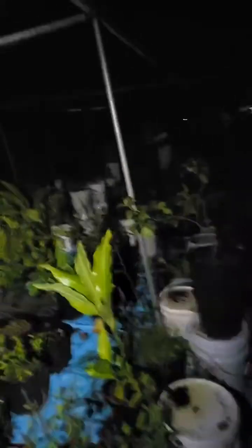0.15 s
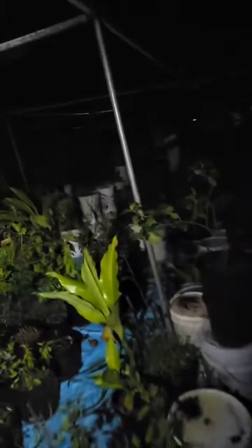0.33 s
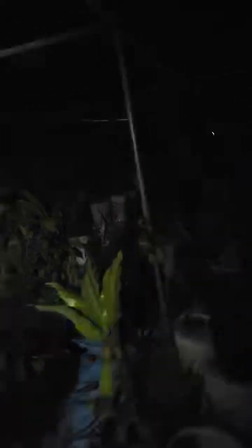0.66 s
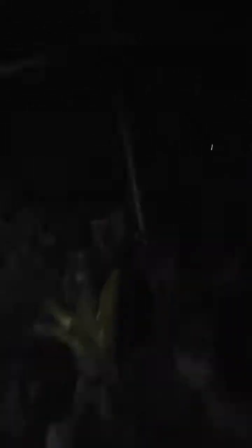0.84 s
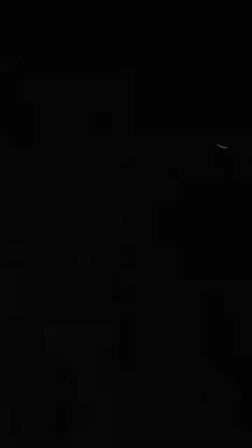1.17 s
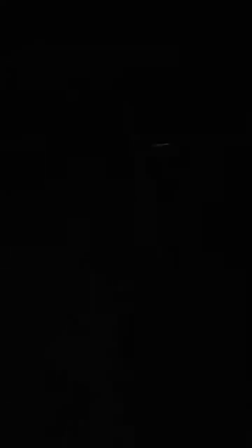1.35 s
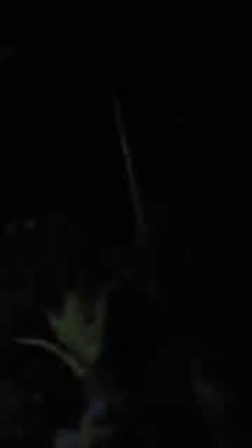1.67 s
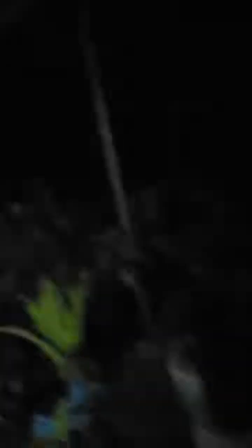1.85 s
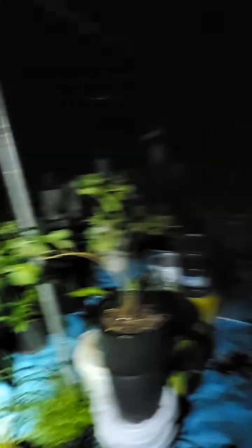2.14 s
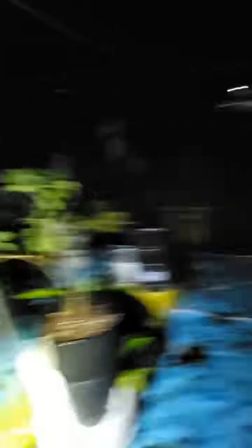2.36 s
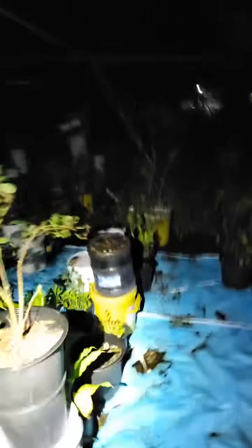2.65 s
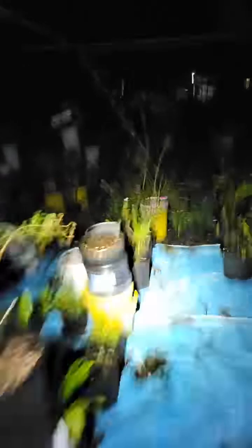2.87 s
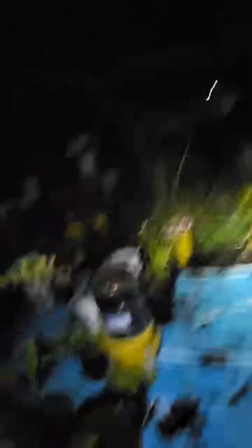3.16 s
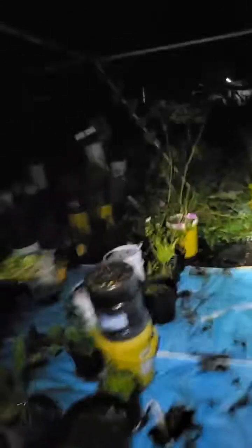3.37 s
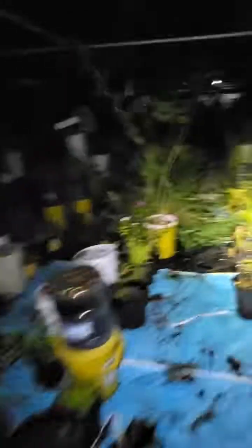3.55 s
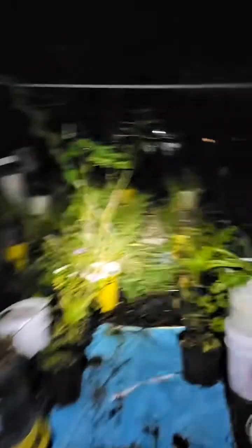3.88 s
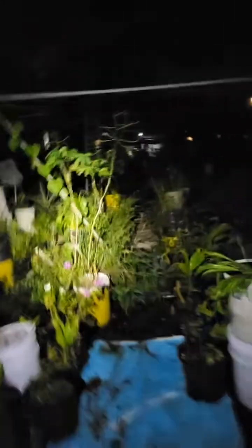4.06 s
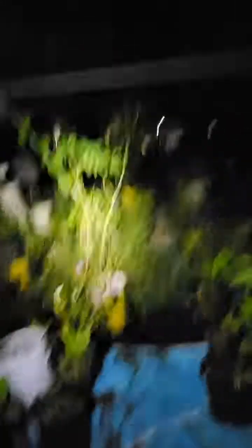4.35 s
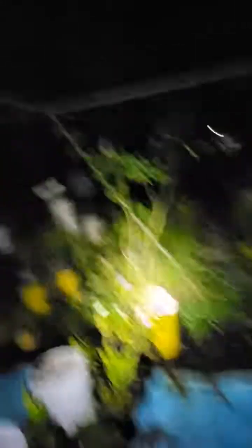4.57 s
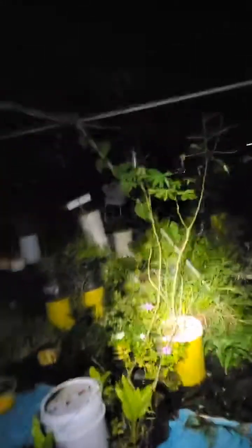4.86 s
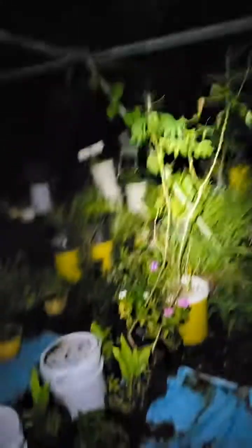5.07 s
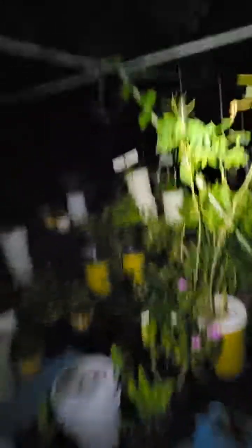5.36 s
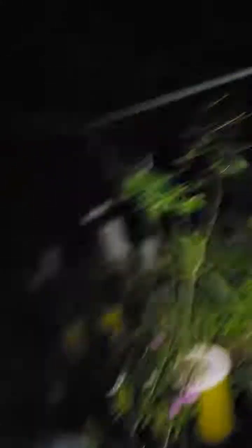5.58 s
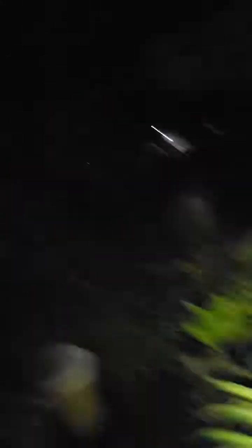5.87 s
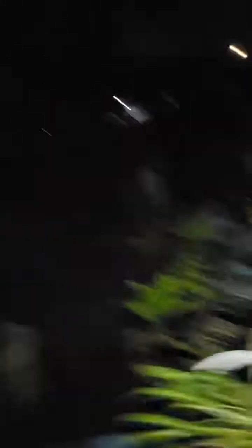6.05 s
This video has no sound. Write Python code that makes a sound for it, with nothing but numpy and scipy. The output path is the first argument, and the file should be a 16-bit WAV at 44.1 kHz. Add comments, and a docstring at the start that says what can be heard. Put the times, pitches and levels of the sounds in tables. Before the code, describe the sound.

Frogs whistle and crickets trill in a steady night chorus while soft footsteps crunch and crinkle over a gritty tarpaulin.

```python
"""A garden at night. From the start, crickets and a katydid trill over a distant engine's rumble;
tree frogs whistle upward, others answer with lower falling notes, and a far chorus of both fills the dark.
Someone walks softly over a gritty tarpaulin: a sole squeaks, and from about two seconds on the sheet
crinkles, heels thud and clods crack. Near five seconds a hand bumps the microphone once.
At the end cloth brushes through the last stride and the katydid is close."""
import sys
import numpy as np
from scipy import signal
from scipy.fft import rfft, irfft, next_fast_len
from scipy.io import wavfile
from scipy.ndimage import map_coordinates

SR = 44100
rng = np.random.default_rng(int(sys.argv[2]) if len(sys.argv) > 2 else 0)


def put_to_file(sound):
    """Save the sound as 16-bit audio at rate SR, in the file named by the first command-line argument."""
    columns = np.atleast_2d(sound).T  # one column per channel
    safe = np.clip(columns, -1, 1)
    whole_steps = np.round(safe * 32767)
    wavfile.write(sys.argv[1], SR, whole_steps.astype(np.int16))


N = 274302


def amp(db):
    """Decibels to gain."""
    return 10 ** (np.asarray(db) / 20)


def unit(x):
    """Scale to rms 1."""
    return x / np.sqrt(np.mean(x ** 2) + 1e-20)


def along(points, hz):
    """Read (Hz, value) points on a log frequency axis."""
    freqs, values = np.transpose(points)
    return np.interp(np.log(hz + 1), np.log(freqs + 1), values)


def fader(points):
    """A fader ride through (seconds, dB) points, in dB for every sample."""
    return np.interp(np.arange(N) / SR, *np.transpose(points))


def envelope(s, rise, hold, release):
    """Gain 1 from s for hold seconds; rise and release are the times to gain and lose 20 dB."""
    t = np.arange(N) / SR - s
    return amp(-20 * (np.maximum(-t, 0) / rise + np.maximum(t - hold, 0) / release).clip(0, 10))


def wobble(rate):
    """A smooth random curve, rate knots a second."""
    return map_coordinates(rng.standard_normal(8192), [np.arange(N) * rate / SR], mode="wrap")


def filtered(x, response):
    """Equalise x with a gain given as a function of Hz."""
    size = next_fast_len(N + SR // 2)
    return irfft(rfft(x, size) * response(np.fft.rfftfreq(size, 1 / SR)), size)[:N]


def noise(spectrum):
    """Coloured noise of rms 1."""
    return unit(filtered(rng.standard_normal(N), lambda hz: amp(along(spectrum, hz))))


def band(centre_hz, width_hz):
    """A steep-sided band of noise, rms 1."""
    white = rng.standard_normal(N)
    return unit(filtered(white, lambda hz: 1 / (1 + (2 * np.abs(hz - centre_hz) / width_hz) ** 4)))


def impulse(spectrum, size=1024):
    """The minimum-phase ring of a body with this spectrum, energy 1."""
    cepstrum = irfft(np.log(amp(along(spectrum, np.fft.rfftfreq(size, 1 / SR)))))
    cepstrum[1:size // 2] *= 2
    cepstrum[size // 2 + 1:] = 0
    ring = irfft(np.exp(rfft(cepstrum)))
    return ring / np.linalg.norm(ring)


def add(track, s, sound):
    """Mix a sound into the track at s seconds and return the track."""
    part = track[max(round(s * SR), 0):][:len(sound)]
    part += sound[:len(part)]
    return track


# The garden's reverb. Each row: frequency in Hz, seconds to die away by 60 dB.
GARDEN_DECAY = [(200, 0.57), (2000, 0.36), (10000, 0.15)]

def garden(x):
    """Diffuse reflections off pots, leaves and roof, wet only."""
    hz, t, spectra = signal.stft(rng.standard_normal(SR // 2), SR, nperseg=256)
    decay = amp(-60 * t / along(GARDEN_DECAY, hz)[:, None])
    tail = signal.istft(spectra * decay, SR, nperseg=256)[1]
    return signal.fftconvolve(x, tail / np.linalg.norm(tail))[:N]


# The tone of the air. Each row: frequency in Hz, relative level in dB.
AIR_EQ = [(100, 6), (200, 2), (450, -4), (900, 0), (1400, -2), (2100, 3.5), (2500, 6), (3400, 1.5),
          (3800, -25.5), (5000, -5), (5700, -10), (7800, -16.5), (11000, -27), (16000, -24)]

def night_air():
    """The steady hush of the night air."""
    return amp(-51.5) * noise(AIR_EQ)


# The engine's noise colour and its hum tones. Each row: frequency in Hz, relative level in dB.
RUMBLE_EQ = [(15, -45), (28, -33), (42, -8), (56, 3.5), (75, 2.5), (100, -2.5), (135, -7.5), (180, -23),
             (300, -47)]
HUM_TONES = [(56, -46.5), (124.7, -52.5)]
# The ride on the hum. Each row: time in seconds, gain in dB.
HUM_RIDE = [(0, 4.5), (.9, -1.5), (1.3, -3), (3, -9), (4.5, -3), (6.22, -27)]

def engine():
    """A distant engine: a steady rumble under two wavering tones that fade away."""
    t = np.arange(N) / SR
    hum = sum(amp(db + 3.2 * wobble(5.25)) * np.sin(2 * np.pi * hz * t + 0.18 * wobble(3.47))
              for hz, db in HUM_TONES)
    return amp(fader(HUM_RIDE)) * hum + amp(-48) * noise(RUMBLE_EQ)


def wing_strokes(rate_hz, depth_db, drift):
    """Tremolo from an insect's wing strokes, now deeper, now shallower; rms 1."""
    phase = 2 * np.pi * np.cumsum(rate_hz * (1 + drift * wobble(9.3))) / SR
    return unit(amp(depth_db * wobble(3.67) * np.sin(phase)))


# The rides on the insects. Each row: time in seconds, level in dB before trims.
LOW_CRICKET_RIDE = [(0.0, -54.5), (0.24, -54.5), (1.87, -51.5), (3.07, -51.5), (3.53, -53.5), (4.23, -50.5),
                    (4.83, -55.5), (5.49, -51), (6.22, -57.5)]
HIGH_CRICKET_RIDE = [(0.0, -48), (0.87, -51.5), (1.56, -52), (2.98, -48), (3.26, -51), (4.43, -52.5),
                     (5.6, -49), (6.22, -56.5)]
FAR_CRICKET_RIDE = [(0.0, -60), (2.08, -60), (2.27, -57), (2.55, -59.5), (4.59, -63), (4.73, -77),
                    (6.22, -61)]
KATYDID_RIDE = [(0, -62), (.5, -69.5), (1.5, -66), (5.66, -65.5), (5.84, -53.5), (6.22, -57)]

def insects():
    """Wings rub out two cricket trills with faint octaves and a high katydid, over a smooth crowd."""
    low_strokes = wing_strokes(rate_hz=32.7, depth_db=1.404, drift=0.015)
    high_strokes = wing_strokes(rate_hz=43.6, depth_db=1.443, drift=0.02)
    low = amp(fader(LOW_CRICKET_RIDE) - 0.65) * low_strokes * (band(6157, 560) + amp(-3) * band(6125, 53))
    high = amp(fader(HIGH_CRICKET_RIDE) - 0.5) * high_strokes * band(7026, 580)
    far_db = fader(FAR_CRICKET_RIDE)
    crowd = amp(-60) * band(6800, 830) + amp(far_db - 1) * band(4790, 1460)
    crowd += amp(-65) * band(6633, 50) + amp(far_db - 10) * band(5135, 70)
    katydid_strokes = wing_strokes(rate_hz=61, depth_db=1.365, drift=0.046)
    katydid = amp(fader(KATYDID_RIDE)) * katydid_strokes * band(9580, 1300)
    octaves = (amp(-65) * band(13200, 2100) + amp(-72.5) * band(15200, 1100)) * amp(0.67 * wobble(7.6))
    return low * amp(0.55 * wobble(3.6)) + high * amp(0.45 * wobble(4.34)) + crowd + katydid + octaves


def note(length, start_hz, end_hz, bend=0.522):
    """A pure gliding note with soft ends; a positive bend moves fast at first, then levels off."""
    progress = np.linspace(0, 1, max(int(length * SR), 2))
    pitch = start_hz + (end_hz - start_hz) * (progress + bend * progress * (1 - progress))
    fades = np.clip(np.minimum(progress / 0.16, (1 - progress) / 0.22), 0, 1)
    return np.sin(np.pi / 2 * fades) * np.sin(2 * np.pi * np.cumsum(pitch) / SR)


def chorus(pitch_hz, spread, glide_hz, length, scatter_db, count):
    """A crowd of frogs, each at its own pitch and distance, blurred by the garden; rms 1."""
    crowd = np.zeros(N + SR)
    times = (np.arange(count) + rng.random(count)) / count * len(crowd) / SR
    for s, (detune, stretch, nearness) in zip(times, rng.standard_normal((count, 3))):
        hz = pitch_hz * np.exp(spread * np.clip(detune, -2, 2))
        call = note(length * np.exp(0.2475 * stretch), hz - glide_hz / 2, hz + glide_hz / 2)
        add(crowd, s, amp(scatter_db * nearness) * call)
    crowd = crowd[SR // 2:][:N]
    return unit(crowd + garden(crowd))


# Bouts of far whistling. Each row: start in seconds, hold in seconds, level in dB.
WHISTLE_BOUTS = [(0, 0.28, -48), (.48, .1, -44), (.76, 0.083, -43.5), (.96, 0.22, -47), (1.332, 0.18, -46),
                 (1.675, .12, -43.5), (1.974, 0.057, -46.5), (2.197, .05, -45), (2.4, 0.17, -44.5),
                 (2.72, 0.15, -46), (3.1, 0.037, -43), (3.325, 0.19, -46), (3.7, 0.099, -41.5),
                 (3.973, 0.23, -44), (4.25, 0.16, -47.5), (4.506, 0.33, -44.5), (4.806, .23, -41.5),
                 (5.25, 0.043, -45), (5.47, 0.087, -43.5), (5.8, 0.13, -41.5), (6.014, 0.2, -42.5)]

def far_whistlers(floor_db=-50):
    """Far tree frogs join in bouts; as every note rises, the high end of a bout comes late."""
    bout_power = sum((amp(db) * envelope(s, 0.065, hold, 0.16)) ** 2 for s, hold, db in WHISTLE_BOUTS)
    swell = np.sqrt(amp(floor_db) ** 2 + bout_power)
    shift = int(0.02 * SR)
    early = np.pad(swell, (0, shift), "edge")[shift:]
    late = np.pad(swell, (shift, 0), "edge")[:N]
    low = chorus(pitch_hz=2800, spread=0.0322, glide_hz=303.5, length=0.0596, scatter_db=3, count=750)
    high = chorus(pitch_hz=3054, spread=0.03277, glide_hz=250.5, length=0.061, scatter_db=0.5, count=750)
    return early * low + late * high


# Swells and lulls of the far low frogs. Each row: centre in seconds, length in seconds, change in dB.
LOW_FROG_SURGES = [(0.19, 0.18, -8), (3.702, 0.081, -5), (4.81, 0.27, 7), (4.956, 0.21, -11),
                   (5.125, .16, -14)]

def far_low_frogs():
    """Two far crowds with falling notes, one higher and shorter, swell and fall quiet together."""
    surge_db = np.zeros(N)
    for s, length, db in LOW_FROG_SURGES:
        add(surge_db, s - length / 2, db * np.hanning(int(length * SR)))
    pond = chorus(pitch_hz=1662.5, spread=0.02514, glide_hz=-65, length=0.0564, scatter_db=5, count=600)
    peeps = chorus(pitch_hz=1824, spread=0.04, glide_hz=-140, length=0.033, scatter_db=1.5, count=500)
    return amp(surge_db) * (amp(-46) * pond + amp(-51) * peeps)


def falling_glide(length, hz):
    """Glide of a low note in Hz: the higher it is, the further it sinks."""
    return -55 - 0.31 * (hz - 1604)


def rising_glide(length, hz):
    """Glide of a whistle in Hz: the longer it lasts, the further it climbs."""
    return 353 * np.sqrt(length / 0.0514)


# The near frogs' calls. Each row: start in seconds, length in seconds, middle pitch in Hz, level in dB.
FALLING_CALLS = [(.05, 0.1, 1556, -39), (.26, 0.098, 1644, -34.5), (.36, 0.035, 1800, -36.5),
                 (.545, 0.071, 1600, -38.5), (1.015, 0.032, 1904, -40.5), (1.1, 0.068, 1535, -42.5),
                 (1.13, 0.023, 1805, -42), (1.24, 0.061, 1698, -39.5), (1.525, .065, 1683, -40),
                 (1.695, 0.071, 1877, -43), (1.755, 0.041, 1660, -34), (1.89, 0.069, 1550, -39),
                 (2.045, 0.035, 1720, -34.5), (2.19, 0.061, 1636, -38), (2.465, 0.08, 1580, -40.5),
                 (2.63, 0.071, 1870, -41), (2.795, 0.021, 1840, -39), (2.8, 0.049, 1584, -40),
                 (2.9, 0.058, 1723, -41), (3.46, 0.065, 1720, -40), (3.5, 0.092, 1541, -38.5),
                 (3.62, 0.021, 1793, -36.5), (3.93, 0.053, 1555, -35), (4.065, 0.064, 1652, -34.5),
                 (4.09, 0.033, 1875, -41), (4.172, 0.044, 1833, -34.5), (4.65, 0.042, 1845, -38),
                 (4.66, 0.073, 1615, -36), (4.74, 0.02, 1814, -29), (4.765, 0.033, 1920, -32),
                 (4.772, 0.034, 1692, -30), (4.995, .083, 1597, -37), (5.28, 0.13, 1855, -43),
                 (5.375, 0.03, 1900, -29), (5.585, 0.051, 1665, -38), (5.87, 0.035, 1866, -39),
                 (5.95, 0.037, 1850, -34.5), (6.055, 0.032, 1904, -42), (6.15, 0.047, 1855, -40)]
RISING_CALLS = [(.43, .045, 2830, -37.5), (.48, 0.09, 2990, -38), (.7, .12, 2675, -43),
                (1.05, 0.074, 3095, -40.5), (1.3, .055, 2950, -41.5), (1.335, 0.099, 2680, -40.5),
                (1.63, 0.029, 2790, -38), (1.94, 0.089, 2835, -39.5), (2.425, 0.061, 2993, -36.5),
                (2.69, 0.036, 2960, -36), (2.755, .033, 2926, -38), (3.32, 0.028, 3030, -39),
                (3.41, .058, 2945, -39), (3.69, 0.13, 2915, -49), (3.712, 0.018, 2820, -32),
                (4.11, .046, 2977, -44), (4.33, 0.059, 3170, -38), (4.793, 0.049, 2986, -33),
                (4.831, 0.062, 2965, -39), (4.885, 0.12, 2905, -38.5), (4.94, 0.096, 2965, -38.5),
                (5.187, .12, 2785, -38.5), (5.39, 0.057, 2745, -42), (5.495, 0.087, 2703, -36.5),
                (5.525, 0.029, 3067, -34), (5.79, .06, 2740, -37), (5.835, 0.034, 3105, -30.5),
                (6.006, 0.029, 2890, -30), (6.034, 0.0255, 2870, -30)]

def near_frogs(calls, glide, flutter_db, wet_db):
    """Single callers, each note with a slight flutter and the echoes of its own spot in the garden."""
    voices = np.zeros(N)
    for s, length, hz, db in calls:
        half_glide = glide(length, hz) / 2
        direct = amp(db) * note(length, hz - half_glide, hz + half_glide)
        add(voices, s, direct)
        add(voices, s, amp(wet_db) * garden(direct))
    return voices * amp(flutter_db * wobble(170))


def grit(spectrum, rate, spread_db, smooth):
    """Tiny random contacts, rate a second, ring a body over a share of smooth rubbing; rms 1."""
    strength = amp(np.minimum(spread_db * rng.exponential(size=N), 10))
    contacts = (rng.random(N) < rate / SR) * rng.choice([-1, 1], N) * strength
    rings = unit(signal.fftconvolve(contacts, impulse(spectrum))[:N])
    return unit(rings + smooth * noise(spectrum))


def grains(pitch_hz, spread, cycles, spread_db, count):
    """Dense small contacts, each ringing a few cycles at its own pitch; rms 1."""
    t = np.arange(SR // 150) / SR
    start = rng.integers(0, N, (count, 1))
    hz = pitch_hz * np.exp(spread * np.clip(rng.standard_normal((count, 1)), -2, 1.6))
    polarity = rng.choice([-1, 1], (count, 1))
    strength = amp(spread_db * np.minimum(rng.exponential(size=(count, 1)), 2.5))
    rings = polarity * strength * np.sqrt(hz) * np.exp(-hz * t / cycles) * np.sin(2 * np.pi * hz * t)
    return unit(np.bincount((start + np.arange(len(t))).ravel(), rings.ravel(), N)[:N])


def snap(spectrum, t60, scatter):
    """One sharp break followed by a crumble cut off at 50 ms; peak 1."""
    t = np.arange(SR // 20) / SR
    push = scatter * rng.standard_normal(len(t)) * amp(-60 * t / t60)
    push[0] = 1
    sound = signal.fftconvolve(push, impulse(spectrum))
    return sound / np.abs(sound).max()


def thud(start_hz, rest_hz, sag_s, t60):
    """A soft, dull blow whose pitch sinks as the pressure eases."""
    t = np.arange(SR // 3) / SR
    pitch = rest_hz + (start_hz - rest_hz) * np.exp(-t / sag_s)
    return amp(-60 * t / t60) * np.sin(2 * np.pi * np.cumsum(pitch) / SR)


def trouser_rub(s=5.6, length=0.47, db=-45):
    """Cloth brushes dully through the last stride."""
    stride = add(np.zeros(N), s, amp(db) * np.hanning(int(length * SR)))
    return stride * band(340, 210)


def squeak(s=1.233):
    """A sole slips briefly and roughly on the plastic."""
    slip = amp(-44) * note(length=0.029, start_hz=3200, end_hz=5200, bend=-0.32)
    roughness = 0.8 + 0.8 * wobble(1000)
    return add(np.zeros(N), s, slip) * roughness


def microphone_bump(s=4.893, lowpass_hz=450):
    """A hand bumps the microphone's housing."""
    blow = amp(-22) * thud(start_hz=170, rest_hz=45.3, sag_s=0.0074, t60=0.33)
    return filtered(add(np.zeros(N), s, blow), lambda hz: 1 / (1 + 1j * hz / lowpass_hz))


# The bright tone of a stalk. Each row: frequency in Hz, relative level in dB.
STALK_EQ = [(1500, -24), (5000, 9.5), (8000, -6.5), (10000, 1), (13000, 1), (16000, 5)]
# Leaf flicks. Each row: start in seconds, 60 dB decay time in seconds, peak in dB.
LEAF_FLICKS = [(.14, .15, -39), (1.52, 0.17, -41), (2.933, 0.17, -29), (3.409, 0.051, -27.5),
               (3.65, 0.021, -33), (3.68, .04, -35), (3.744, .092, -36), (3.771, .05, -36),
               (3.876, 0.051, -30), (3.884, .015, -29), (4.498, .06, -32), (5.918, .05, -45)]

def leaves(drag_s=0.038, drag_db=-20.5):
    """Leaves and stalks drag softly against the walker, then flick free."""
    flicks, drag = np.zeros(N), np.zeros(N)
    for s, t60, db in LEAF_FLICKS:
        add(flicks, s, amp(db) * snap(STALK_EQ, t60=t60, scatter=0.61))
        drag += amp(db + drag_db) * envelope(s, drag_s, 0, drag_s / 2)
    return flicks + drag * noise(STALK_EQ)


# The tone of the plastic sheet. Each row: frequency in Hz, relative level in dB.
TARPAULIN_EQ = [(500, -65), (2000, 15.5), (3500, 5), (5200, 3), (8000, -13.5), (11000, -8), (15500, -11)]
# Swells of crinkling. Each row: start in seconds, length in seconds, level in dB.
TARPAULIN_FLEXES = [(2.04, 0.41, -42.5), (2.876, .089, -46.5), (3.061, 0.12, -37.5), (3.363, .098, -42.5),
                    (3.737, 0.21, -40), (3.934, 0.17, -50), (4.456, 0.15, -49), (5.64, 0.34, -39.5),
                    (5.893, 0.057, -36)]

def crinkles():
    """The tarpaulin flexes and gives way unevenly, fold by fold."""
    flexing = np.zeros(N)
    for s, length, db in TARPAULIN_FLEXES:
        add(flexing, s, amp(db) * np.hanning(int(length * SR)))
    folds = unit(amp(1.5 * wobble(110)))
    return flexing * folds * grit(TARPAULIN_EQ, rate=830, spread_db=0.5, smooth=0.86)


# The hollow tone of a scuff. Each row: frequency in Hz, relative level in dB.
SCUFF_EQ = [(150, 3), (450, -20), (700, 9), (1000, -2), (1500, -15), (4000, -46)]
# Heel landings. Each row: start in seconds, then the levels of thud, scuff and crushed grit in dB.
FOOTFALLS = [(2.389, -40, -55, -35), (3.116, -34, -43.5, -38.5), (3.85, -31.5, -40, -35),
             (4.505, -50, -32.5, -51), (5.17, -33, -36.5, -49), (5.619, -33.5, -70, -70)]

def heels(squeeze_s=0.018):
    """Each footfall thuds on the soil and squeezes the air from under the tarpaulin."""
    t = np.arange(SR // 4) / SR
    thuds, squeeze = np.zeros(N), np.zeros(N)
    for s, thud_db, scuff_db, _ in FOOTFALLS:
        add(thuds, s, amp(thud_db) * thud(start_hz=218, rest_hz=78, sag_s=0.0041, t60=0.11))
        add(squeeze, s - 0.01, amp(scuff_db) * t / squeeze_s * np.exp(1 - t / squeeze_s))
    return thuds + squeeze * grit(SCUFF_EQ, rate=1500, spread_db=0.3, smooth=0.5)


# The tone of the grit. Each row: frequency in Hz, relative level in dB.
GRIT_EQ = [(60, -18.5), (130, -6.5), (300, 1), (600, -0.5), (1100, -6.5), (1600, 6.5), (2300, -2.5),
           (3500, -8.5), (5500, -18.5), (8000, -28), (15000, -54)]
# A sole's pressure. Each row: time of full weight, rise, hold and release, all in seconds, level in dB.
TREADS = [(0.436, 0.045, .01, 0.24, -51.5), (1.257, 0.072, .01, 0.086, -46.5),
          (1.532, .02, 0.0042, 0.024, -47.5), (2.385, 0.46, 0.026, 0.19, -43.5),
          (3.086, 0.41, 0.052, 0.086, -43), (3.4, 0.18, .01, 0.065, -44), (3.774, 0.028, 0.081, .03, -39),
          (3.915, .025, 0.043, 0.18, -39), (4.471, 0.15, 0.094, 0.048, -30.5),
          (4.617, 0.052, 0.044, 0.46, -43.5), (5.16, 0.034, 0.014, 0.12, -36),
          (5.3, 0.087, 0.017, 0.59, -40), (5.757, 0.16, .16, 0.2, -39)]

def grinding():
    """Soles grind the grit: each tread swells and rolls off unevenly, with a burst as a heel lands."""
    crackle = grains(pitch_hz=1100, spread=0.5, cycles=1.8, spread_db=6.5, count=2000)
    texture = unit(crackle + amp(-1) * grit(GRIT_EQ, rate=2500, spread_db=1.5, smooth=0.25))
    treads = sum(amp(db) * envelope(s, rise, hold, release) for s, rise, hold, release, db in TREADS)
    landings = sum(amp(db) * envelope(s, 0.029, 0.0091, 0.015) for s, _, _, db in FOOTFALLS)
    return (treads * amp(2 * wobble(45)) + landings) * texture


# The loudest crunches underfoot. Each row: start in seconds, level in dB, ring pitch in Hz,
# plastic snap in dB relative to that level.
CLOD_CRACKS = [(.446, -32.6, 925, -11), (.4725, -38, 890, 1), (1.2603, -33, 615, 5),
               (2.397, -28.5, 755, -3), (2.443, -29, 1060, -5), (2.5076, -27, 980, -21),
               (2.9832, -24, 2150, -4), (3.008, -26.5, 1120, -5), (3.0503, -32, 1810, -3),
               (3.1144, -25, 1880, 5), (3.1245, -18, 1450, -17), (3.132, -23, 1100, -9),
               (3.1578, -27, 1390, -4), (3.363, -34.5, 1130, -4), (3.416, -35, 2100, 3.5),
               (3.784, -18, 1640, -25), (3.8122, -20.5, 1560, -23), (3.849, -22, 1590, -19),
               (3.856, -14, 1880, -33), (3.9021, -24, 1640, -11), (3.9496, -25.5, 820, -10),
               (3.9717, -26.5, 1730, -1.5), (3.993, -31, 1500, 2), (4.023, -24.5, 1340, -25),
               (4.0889, -23.5, 1530, -27), (4.367, -29, 1370, -20), (4.4153, -25, 1810, -4),
               (4.502, -19, 850, -7), (4.5216, -18, 1600, -9), (4.544, -20, 1530, -23),
               (4.5593, -23, 1390, -9), (4.5938, -21, 1320, -23), (4.6379, -18.5, 1460, -8),
               (4.6914, -19, 1300, -31.5), (4.8365, -32, 1860, -25), (5.1655, -20.5, 1020, -24),
               (5.1785, -28, 750, -1), (5.2179, -24.5, 960, -20), (5.3593, -28, 1540, -25),
               (5.876, -23, 1610, -11), (6.0722, -20.5, 1670, -7.5), (6.0756, -26.5, 1120, -20)]

def crunches(ring_cycles=0.65):
    """Clods give way singly: a short ring, a crumble and a crisp snap of the plastic."""
    track = np.zeros(N)
    for s, db, ring_hz, snap_db in CLOD_CRACKS:
        crumble = 0.55 * snap(GRIT_EQ, t60=0.026, scatter=0.072)
        turns = ring_hz * np.arange(len(crumble)) / SR
        ring = turns / ring_cycles * np.exp(1 - turns / ring_cycles) * np.sin(2 * np.pi * turns)
        crisp = amp(snap_db) * snap(TARPAULIN_EQ, t60=0.028, scatter=0.19)
        add(track, s, amp(db) * (ring + crumble + crisp))
    return track


def walker():
    """Soft steps over the tarpaulin; only the grit, plastic and leaves get a touch of garden reverb."""
    steps = grinding() + crinkles() + crunches() + leaves()
    return steps + amp(-17) * garden(steps) + heels() + squeak() + trouser_rub()


def scene():
    """The walker, frogs, insects and night ambience at one hand-held microphone."""
    foreground = walker() + microphone_bump()
    frogs = far_whistlers() + far_low_frogs()
    frogs += near_frogs(FALLING_CALLS, falling_glide, flutter_db=2.4, wet_db=-10)
    frogs += near_frogs(RISING_CALLS, rising_glide, flutter_db=3.3, wet_db=-8)
    return (foreground + frogs + insects() + engine() + night_air())[None]


def record(dry):
    """The small microphone sheds the deepest bass; the recorder keeps nothing above its band limit."""
    low_cut_hz, top_hz = 32.0, 15800
    return filtered(dry[0], lambda hz: (hz < top_hz) * hz ** 3 / np.sqrt(hz ** 6 + low_cut_hz ** 6))[None]


dry = scene()
out = record(dry)
put_to_file(out)
```